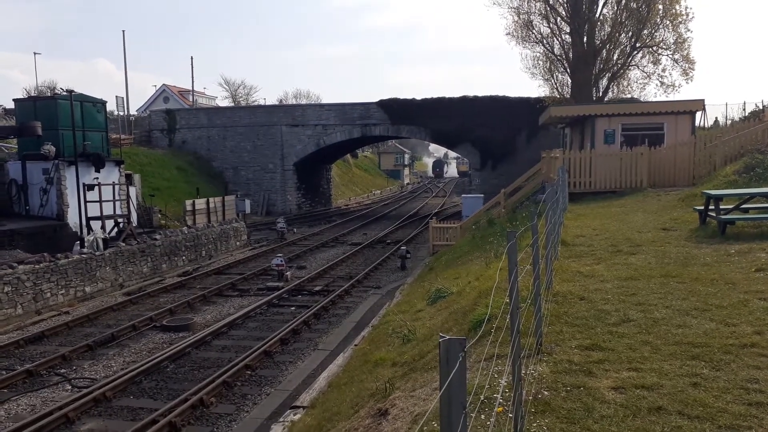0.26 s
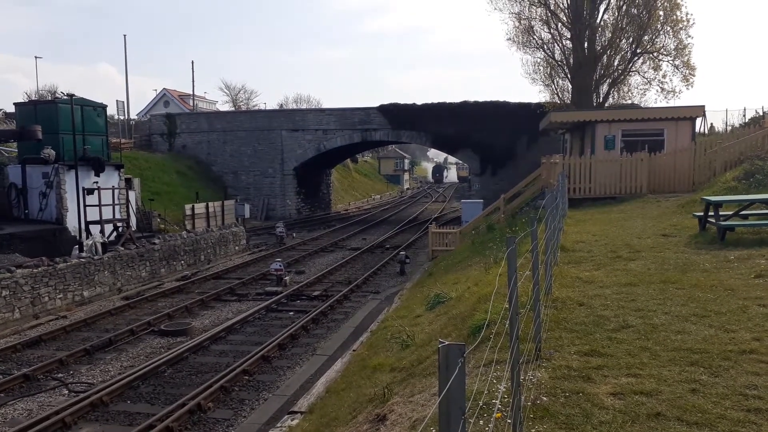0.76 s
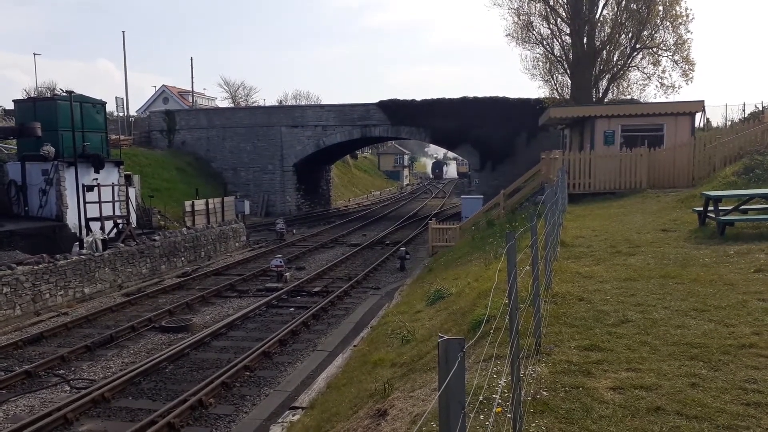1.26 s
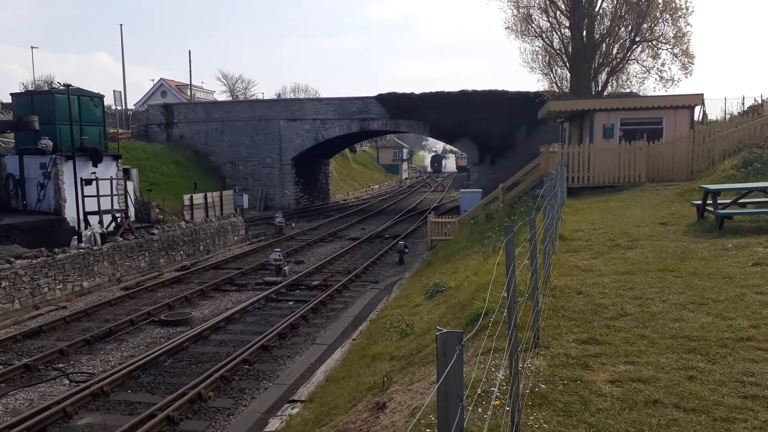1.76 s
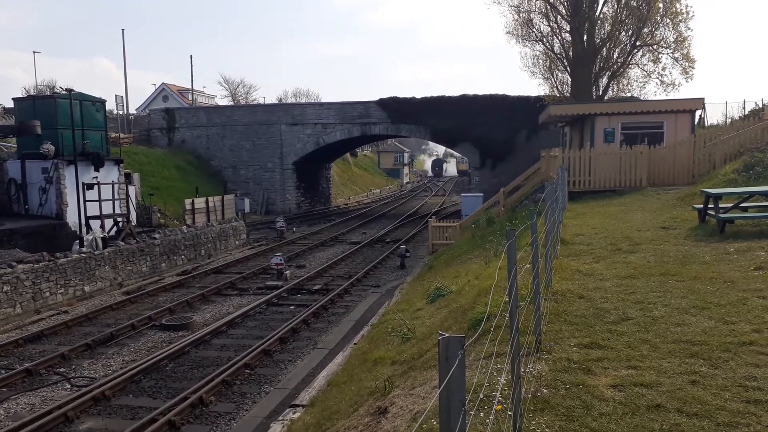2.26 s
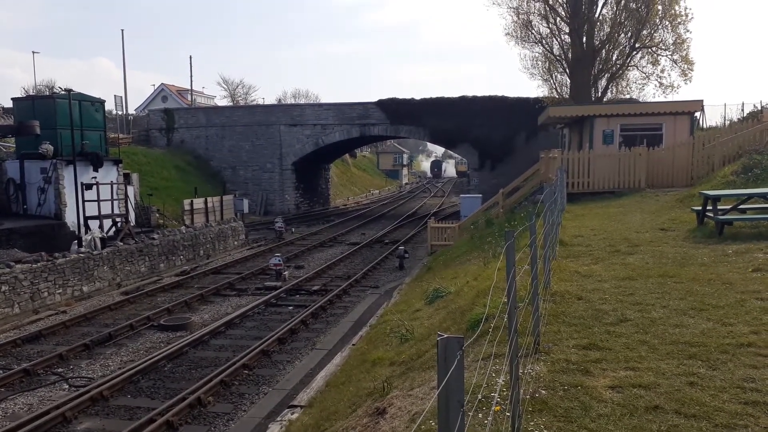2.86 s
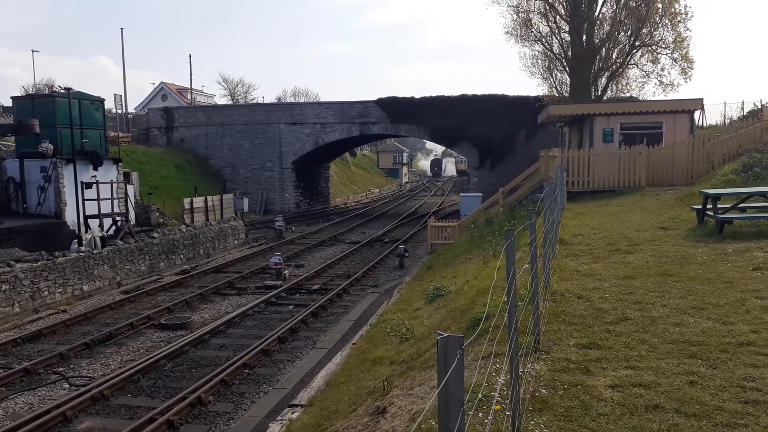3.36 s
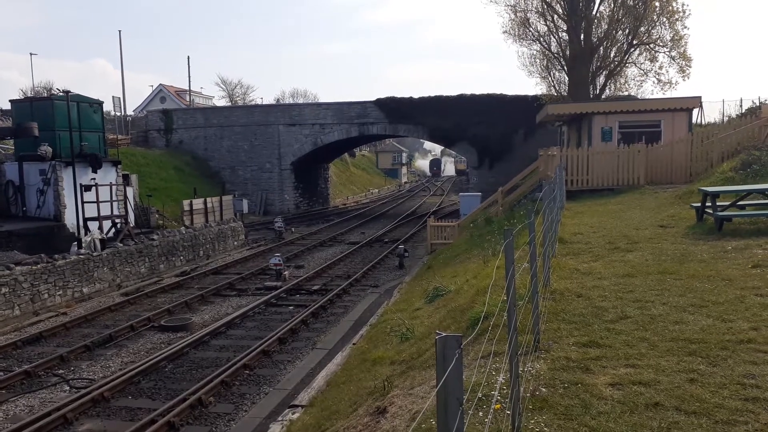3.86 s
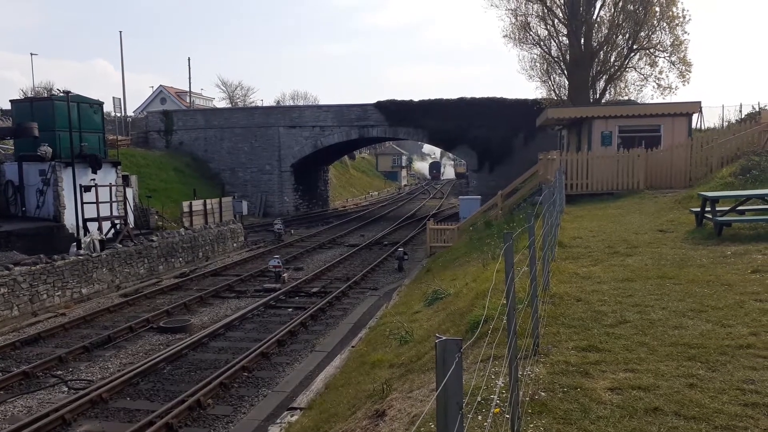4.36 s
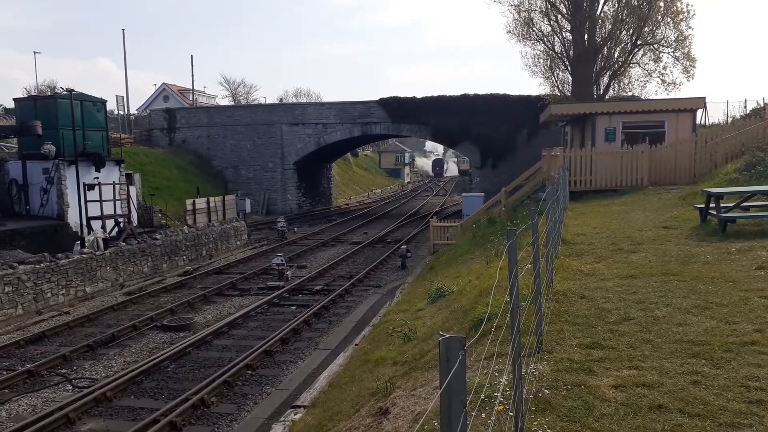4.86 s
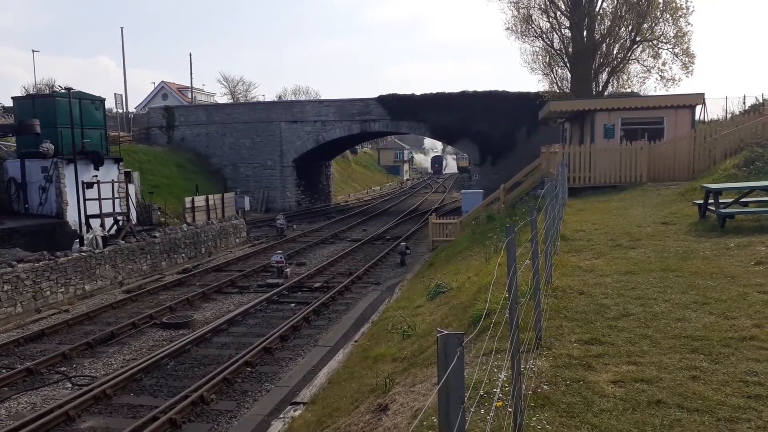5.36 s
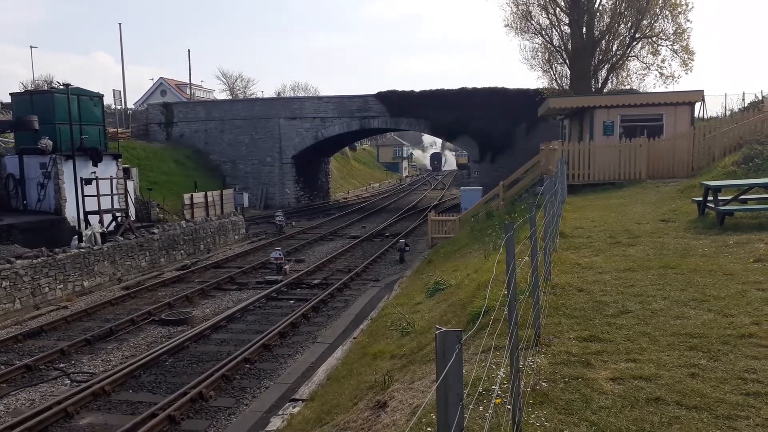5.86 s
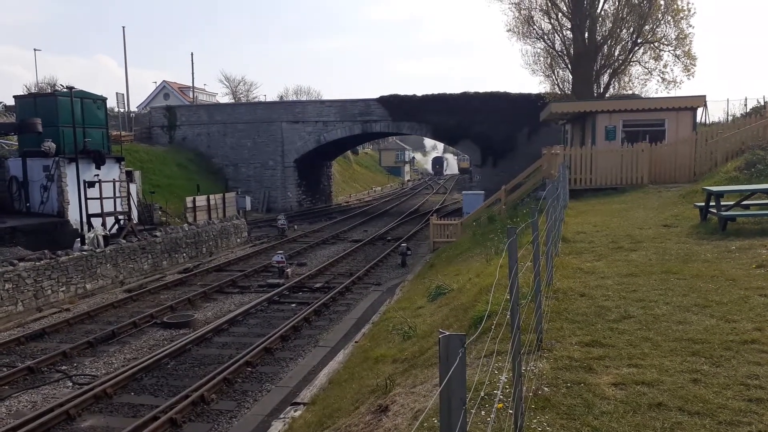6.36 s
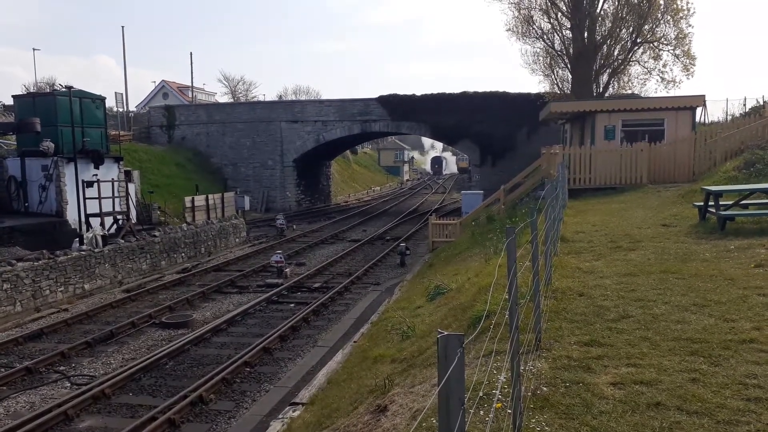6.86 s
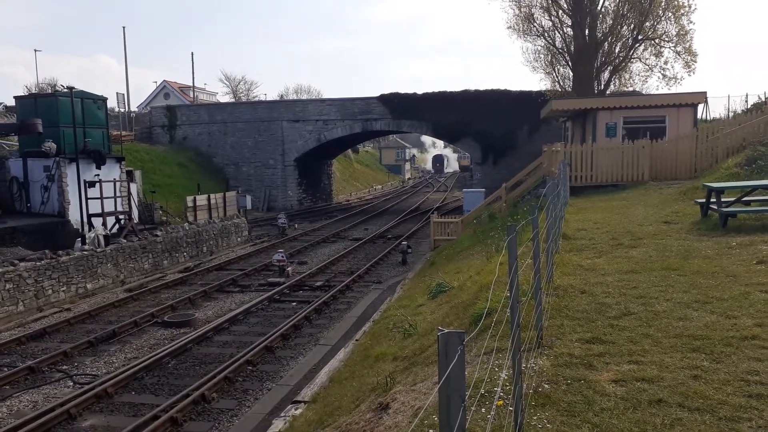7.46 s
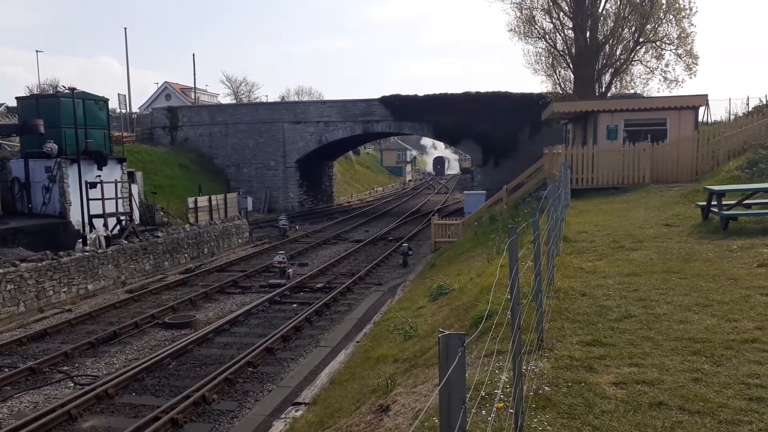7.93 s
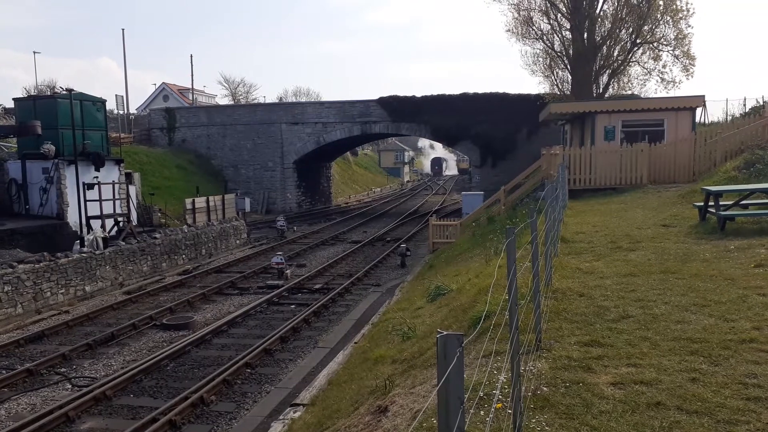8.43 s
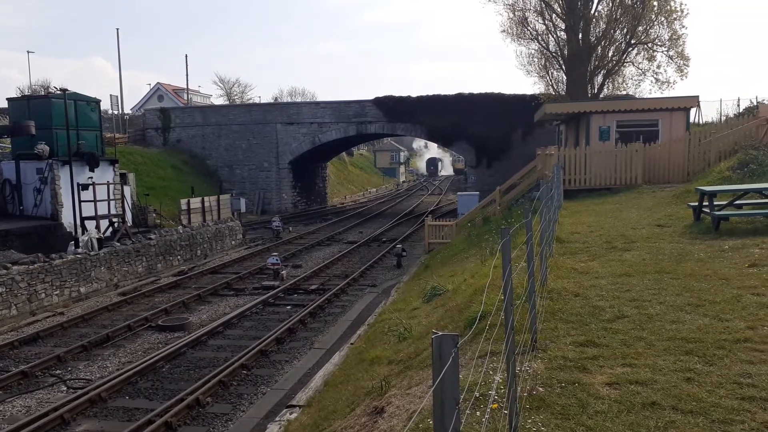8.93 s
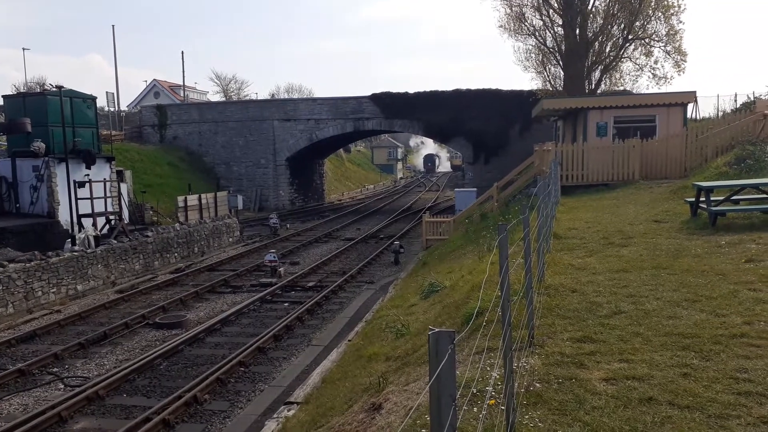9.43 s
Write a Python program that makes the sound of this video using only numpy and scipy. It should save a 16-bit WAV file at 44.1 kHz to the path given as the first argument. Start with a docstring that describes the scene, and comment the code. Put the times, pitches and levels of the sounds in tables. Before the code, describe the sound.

A steam locomotive beyond a stone bridge blows off steam, heard outdoors from beside the track. The first hiss is open at once at 0 s, with a brief faint rustle, and holds until about 1.3 s before dying quickly to a thin leak. Low wind bumps hit the microphone around 0.8-1.5 s, and softer ones at 2.4-2.9 s. A second swell opens near 3.4 s, fullest around 4.6 s, with bright spurts and faintly singing pitches, fading after 6 s into stronger leakage. A small wind thump falls at 4.5 s and weaker ones follow. The third and loudest rush starts abruptly at 7.5 s, with one hard little click at 7.9 s, gradually brightening and continuing to the end at 9.7 s. Throughout, a quiet engine hum, passing low drones and dull station background sit underneath; short stonework echoes put rippling colour in the hiss.

```python
"""Locomotive blowing off steam

A steam locomotive beyond a stone bridge blows its cylinder cocks in three long swells as it sets off.
Jets are banded noise with wandering peaks from echo ripple and pipes; some sing out. Stonework echoes.
Resonant noise makes the engine's hum and drones; a dull coloured noise is the station background.
Low noise gusts and sine buffets bump the microphone, with faint treble rustles and one click."""
import sys
import numpy as np
from scipy import signal
from scipy.fft import rfft, irfft, next_fast_len
from scipy.io import wavfile

SR = 44100
rng = np.random.default_rng(int(sys.argv[2]) if len(sys.argv) > 2 else 0)


def inscribe(sig):
    """Save sig as 16-bit PCM at rate SR to the path in sys.argv[1].

    A 1-D sig is mono; a 2-D sig holds one channel per row.
    Samples are clipped to [-1, 1] before scaling.
    """
    pcm = np.round(np.clip(np.atleast_2d(sig).T, -1, 1) * 32767)
    wavfile.write(sys.argv[1], SR, pcm.astype(np.int16))


N = 427329
TIME = np.arange(N) / SR
SIZE = 2 * next_fast_len(N // 2 + 1)
FREQ = np.maximum(np.arange(SIZE // 2 + 1) * SR / SIZE, 1)
SIDES = np.array([[1], [-1]])  # left, right
FRAME = 2048

# Side levels are left over right. Length of a swell: standard deviation of its bell.
# Station background colour: freq_hz, density_db
YARD_COLOUR = [(25, -37), (55, -1), (110, -9.5), (150, -3), (200, -1), (310, -1.9), (430, -5), (700, 4),
               (2000, -43), (9000, -24.5), (15500, -30.5)]
# Station background level, before trim: time_s, level_db
YARD_LEVEL = [(0, -50.5), (3.8, -51), (4.6, -55.5), (5.4, -52), (6.6, -53), (7.5, -51), (8.2, -56),
              (9.69, -54.5)]

# Steady engine notes, before trim and fade: pitch_hz, level_db
HUM_NOTES = [(190, -61), (113.7, -67.5), (220, -69.5), (302.6, -70), (336.5, -68.5), (374, -70.5)]
# Low drones that come and go: centre_s, pitch_hz, level_db, length_s
DRONE_NOTES = [(3.89, 287.4, -57, 0.21), (5.367, 245, -57.5, 0.074), (5.5, 127, -62, 0.39),
               (7.45, 302, -59, 0.084), (9.05, 117, -61, 0.19)]
HUM_PASS_WIDTH_HZ, HUM_WAVER_DB, HUM_FADE_DB_PER_S = 8.1, 1.5, 0.4

# Wind colour: freq_hz, density_db
WIND_COLOUR = [(20, -34), (35, -30), (52, 0.5), (90, -2), (140, -8), (250, -17), (500, -36), (1500, -70)]
# Gusts on the microphone, before trim: centre_s, level_db, length_s, side_db
GUST_SWELLS = [(0.01, -45, 0.11, -8), (0.873, -40, 0.063, 2), (.68, -52, 0.13, 23), (1.044, -46, 0.092, 2),
               (1.21, -44, 0.055, -9), (1.38, -43, 0.038, -11), (1.527, -49.5, 0.19, 10),
               (1.93, -50.5, 0.026, 9.5), (2.49, -52, 0.046, 12), (2.88, -50, 0.11, 13),
               (3.04, -52, .04, 1), (3.22, -54.5, 0.066, -7), (4.546, -47, 0.075, 21),
               (4.917, -53, 0.046, 18), (5.77, -54, 0.063, 18), (6.35, -61, 0.44, 6), (7.1, -57, 0.17, 9),
               (8.27, -58, 0.073, 9)]
# Sharp buffets: centre_s, level_db, pitch_hz, length_s (to 1/e), side_db
BUFFET_PULSES = [(.834, -35, 95, 0.0079, 4), (0.855, -27, 86, .012, -9), (.897, -35, 100, .014, 7),
                 (1.238, -32, 89, 0.012, -17), (1.328, -37, 85, 0.0083, 10), (1.382, -38, 95, .008, -10),
                 (1.408, -37, 90, .008, -11), (1.504, -42, 85, 0.0093, 9), (2.415, -37, 136, .007, 3),
                 (2.489, -43, 60, 0.013, 14), (2.805, -40, 60, .016, 12), (2.854, -39.5, 72, 0.015, 2),
                 (2.906, -38, 80, .011, 7), (4.556, -46, 115, .016, 14), (4.908, -44, 76, .02, 16),
                 (5.772, -42, 62, .022, 16)]
# Light air between gusts, before trim
BREEZE_DB, BREEZE_SIDE_DB, BREEZE_SWING_DB, BREEZE_HZ = -64, 23, 7.5, 3.6

# Faint high rustles: centre_s, level_db, length_s
RUSTLE_STROKES = [(0.048, -53, 0.083), (1.92, -64, .05), (2.03, -62, .06), (2.67, -60, .03),
                  (3.95, -62, .03)]
# Rustle colour: freq_hz, density_db
RUSTLE_COLOUR = [(5000, -30), (9000, 0), (12000, -1), (15500, -4)]
CLICK_S, CLICK_DB, CLICK_HZ, CLICK_DECAY_S = 7.877, -22, 2500, 0.0015

# Smooth jet colour: freq_hz, density_db
JET_COLOUR = [(300, -36), (450, -36), (575, -12), (850, -12.5), (1270, -8), (1600, -5), (2850, -3.5),
              (4000, -1), (5700, -3.5), (6700, -7), (8200, -12.5), (9200, -24), (12000, -25.5),
              (16000, -45)]
# Mean peaks in the steam's colour, narrow low ones from echo ripple, broader ones from pipes:
# pitch_hz, width_hz, lift_db
STEAM_PEAKS = [(706, 14, 6), (860, 19, 4), (988, 56, 7.5), (1098, 64, 4.5), (1440, 22, 6), (1551, 26, 4),
               (1686, 95, 4.5), (2054, 140, 4), (2225, 17, 5.5), (2407, 32, 4), (2567, 130, 4),
               (3160, 127, 5), (3323, 104, 5), (3850, 160, 4), (4340, 160, 1), (5030, 180, 3.5),
               (5800, 130, 2), (7180, 260, 1.5), (7720, 820, 3), (9500, 300, 2.5)]
# Peaks that sing out: centre_s, length_s, pitch_hz, width_hz, extra_lift_db
SINGING_PEAKS = [(0.502, 0.28, 3950, 500, 2), (0.746, 0.026, 900, 500, 3), (.9, 0.31, 3090, 150, 3),
                 (2.2, 0.18, 3080, 200, 3), (3.855, 0.08, 3420, 200, 3.5), (4.55, 0.073, 3440, 110, 7),
                 (4.7, .22, 3930, 180, 4.5), (5.22, .16, 3900, 260, 4), (4.95, 0.38, 1870, 110, 5.5),
                 (5.0, 0.45, 3360, 180, 4.5), (5.05, 0.49, 8250, 700, 5.5), (5.2, 0.57, 2670, 200, 4.5),
                 (4.9, 0.1, 2430, 120, 4), (5.42, 0.11, 2540, 130, 5), (5.66, 0.15, 800, 600, 3.5),
                 (5.69, 0.28, 1910, 480, 5.5), (5.92, 0.14, 2530, 160, 5.5), (6.0, .15, 3290, 240, 4),
                 (7.05, .25, 3880, 260, 4), (7.1, 0.58, 746, 260, 6), (7.15, 0.22, 3420, 147.4, 2),
                 (7.615, 0.049, 805, 600, 1), (7.65, 0.23, 3320, 110, 5.5), (7.66, .07, 5200, 220, 4),
                 (7.8, 0.081, 3200, 120, 5), (7.82, 0.33, 2490, 150, 5.5), (8.15, 0.071, 5230, 260, 6),
                 (8.45, 0.21, 2480, 130, 5.5), (9.25, .35, 2470, 120, 8), (9.3, 0.15, 3370, 70, 8)]
# Spread of each steam peak's pitch and lift (shares), duration of a change
PEAK_WANDER, PEAK_SWING, PEAK_WANDER_S = 0.004, 0.07, 0.46
# Patches in the colour of the hiss
MOTTLE_DB, MOTTLE_HZ, MOTTLE_S = 1.0, 110, 0.23

# Steam at the two microphone ports, level: freq_hz, side_db
PORT_BALANCE = [(500, 3.5), (1800, 4), (2200, 4.5), (2500, 4), (2780, 3.5), (3100, 4), (3520, 4),
                (4200, 0.5), (4750, -5), (5600, 4.5), (6500, -0.5), (7300, 8.5), (8800, 9.5), (11500, 0.5)]
# Steam at the two ports, correlation: freq_hz, likeness
PORT_LIKENESS = [(100, .7), (700, .98), (1500, 0.66), (3000, 0.77), (4500, .96), (6000, 0.97), (7000, .68),
                 (9000, 0.53), (11500, 0.94), (13500, 0.87), (15500, .2)]
# Steam at the two ports, phase: freq_hz, left_lead_rad
PORT_LEAD = [(100, -0.4), (1900, -0.33), (2250, -1.5), (2700, 1), (3300, -.8), (4100, -1.5), (4800, -1),
             (5300, -1), (6250, -0.9), (6850, -1.4), (7500, -1), (9100, -2), (11000, -2.5)]

# Flow levels below are before the steam's trim.
# One blow per piston stroke, the first open almost at once: start_s, opening_s, fullest_after_s,
# shuts_after_s, dying_s, rush_db, hiss_db and sizzle_db (re rush), ring_db (re open jet),
# brightening_db_per_s
BLOW_STROKES = [(0.0, 0.00053, 0.32, 1.3, 0.22, -28, -6.5, -15, 3.5, -1.9),
                (3.385, 0.093, 1.19, 2.665, .15, -28, -5, -12.5, 2.2, -0.57),
                (7.522, 0.035, 0.77, 2.6, .2, -24.5, -7, -14.5, 1.2, 1.5)]
# Steam leaking between blows: time_s, rush_db
LEAK_LEVEL = [(0, -35), (1.9, -39), (2.7, -36.5), (3.35, -37), (6.3, -31), (6.8, -33), (7.5, -28.5),
              (8.3, -31.5), (9.69, -26.5)]
# Brief bright spurts: centre_s, rush_db, length_s, sizzle_db (re rush)
SPURT_SWELLS = [(1.263, -38, 0.05, -13), (3.76, -42, .03, -8), (3.932, -31, 0.035, -15),
                (4.305, -30, 0.1, -13), (4.49, -30.5, 0.096, -11), (4.813, -31, .08, -11),
                (5.282, -31.5, 0.29, -5.5), (5.926, -37, 0.16, -6.5), (7.62, -25, 0.059, -22),
                (8.5, -43, .18, 2), (8.98, -29.5, .05, -11), (9.358, -37, .07, -7)]
LEAK_RING_DB, LEAK_HISS_DB, LEAK_SIZZLE_DB = 3, -7, -13
SPURT_RING_DB, SPURT_HISS_DB = 6.5, -4
ARCH_DB_PER_S2 = 2.5
TREBLE_LAG_DB, DULLING_DB_PER_S = 10, 14

# Low roar: level at a reference jet level, share of the jet's dB swing it follows
ROAR_DB, ROAR_AT_JET_DB, ROAR_FOLLOWS = -42, -33, 0.52
ROAR_GROWTH_DB_PER_S = 0.1  # as the engine gets under way

# Echoes from ground and stonework: mean_delay_s, level_db (re direct)
STONE_ECHOES = [(.0022, -18), (.0105, -15), (.017, -16), (.047, -15)]
CUTOFF_HZ = 15800


def from_db(db):
    """Decibels to gain."""
    return 10 ** (np.asarray(db) / 20)


def in_time(points):
    """Level curve joined by straight lines."""
    time_s, level_db = np.transpose(points)
    return np.interp(TIME, time_s, level_db)


def over_hz(points):
    """Table read at every frequency on a log axis."""
    hz, value = np.transpose(points)
    return np.interp(np.log(FREQ), np.log(hz), value)


def white():
    """Spectrum of fresh white noise."""
    return rng.standard_normal(len(FREQ)) + 1j * rng.standard_normal(len(FREQ))


def sound(spectrum):
    """Stereo spectrum to waveform; the mean of both sides has rms 1."""
    x = irfft(spectrum, SIZE)[:, :N]
    return x / np.std(x.mean(axis=0))


def resonance(hz, width_hz):
    """Response of one resonance, 1 at its peak."""
    return 1 / (1 + 1j * (FREQ ** 2 - hz ** 2) / (FREQ * width_hz))


def drift(rate_hz):
    """Slow random curve with spread 1."""
    x = irfft(white() / (1 + (FREQ / rate_hz) ** 2), SIZE)[:N]
    return x / np.std(x)


def smooth_chance(shape, *spans):
    """Random field with spread 1, smoothed over a span of steps along each axis."""
    x = rng.standard_normal(shape)
    for axis, span in enumerate(spans):
        rate = np.fft.rfftfreq(shape[axis])
        spectrum = rfft(np.swapaxes(x, axis, -1)) * np.exp(-(2 * rate * span) ** 2)
        x = np.swapaxes(irfft(spectrum, shape[axis]), axis, -1)
    return x / np.std(x)


def noise_pair(likeness, side_db, lead_rad=0):
    """Spectra of partly alike noise at two ports, with level and phase offsets."""
    pair = np.sqrt(1 + likeness) * white() + np.sqrt(1 - likeness) * white() * SIDES
    return pair * from_db(SIDES * side_db / 2) * np.exp(0.5j * SIDES * lead_rad)


def ports(side_db):
    """Left and right gains of mean power 1."""
    pair = from_db(SIDES * side_db / 2)
    return pair / np.sqrt(np.mean(pair ** 2))


def swell(centre_s, length_s):
    """Bell-shaped rise and fall of height 1."""
    return np.exp(-((TIME - centre_s) / length_s) ** 2 / 2)


def together(gains):
    """Unrelated flows add in power."""
    return np.sqrt(sum(g ** 2 for g in gains))


def yard(trim_db=1.0):
    """Dull station background: coloured noise on a slow level curve."""
    noise = sound(noise_pair(likeness=0.87, side_db=4.0) * from_db(over_hz(YARD_COLOUR)))
    return from_db(in_time(YARD_LEVEL) + trim_db) * noise


def hum(trim_db=-0.3, waver_hz=1.2):
    """Engine notes as narrow resonances of noise: steady ones waver and fade, drones swell and sink."""
    throb = noise_pair(likeness=0.88, side_db=7.5)

    def note(hz):
        return sound(throb * resonance(hz, HUM_PASS_WIDTH_HZ) ** 2)

    steady = sum(from_db(db) * note(hz) for hz, db in HUM_NOTES)
    drones = sum(from_db(db) * swell(s, length_s) * note(hz) for s, hz, db, length_s in DRONE_NOTES)
    level_db = trim_db + HUM_WAVER_DB * drift(waver_hz) - HUM_FADE_DB_PER_S * TIME
    return steady * from_db(level_db) + drones


def gusts(trim_db=-3):
    """Wind rumble, little alike at the two ports: gusts over a light breeze."""
    breeze_db = BREEZE_DB + BREEZE_SWING_DB * np.tanh(drift(BREEZE_HZ))
    forces = [from_db(breeze_db) * ports(BREEZE_SIDE_DB)]
    for s, db, length_s, side_db in GUST_SWELLS:
        forces.append(from_db(db) * swell(s, length_s) * ports(side_db))
    rumble = sound(noise_pair(likeness=0.23, side_db=-0.2) * from_db(over_hz(WIND_COLOUR)))
    return from_db(trim_db) * together(forces) * rumble


def buffets():
    """Single low swings of pressure: sines under a short bell, random phase per port."""
    out = 0
    for s, db, hz, length_s, side_db in BUFFET_PULSES:
        age_s = TIME - s
        phase_rad = rng.uniform(0, 2 * np.pi) + rng.normal(0, 1.0, (2, 1))
        swing = np.exp(-(age_s / length_s) ** 2) * np.sin(2 * np.pi * hz * age_s + phase_rad)
        out = out + ports(side_db) * from_db(db) * swing
    return out


def rustles():
    """Short, thin brushing sounds: swells of treble noise."""
    strokes = sum(from_db(db) * swell(s, length_s) for s, db, length_s in RUSTLE_STROKES)
    return strokes * sound(noise_pair(likeness=0.1, side_db=4.0) * from_db(over_hz(RUSTLE_COLOUR)))


def click():
    """One hard tick in the last swell: resonant noise with a fast rise and decay."""
    age = np.maximum(TIME - CLICK_S, 0) / CLICK_DECAY_S
    knock = sound(noise_pair(likeness=0.8, side_db=4) * resonance(CLICK_HZ, width_hz=1800) ** 3)
    return from_db(CLICK_DB) * age * np.exp(1 - age) * knock


def voices(rush, ring_db, hiss_db, sizzle_db):
    """Gains of open jet, ringing band, upper hiss and sizzle; the first two share the rush power."""
    open_jet = rush / together([1, from_db(ring_db)])
    ringing = open_jet * from_db(ring_db)
    return np.array([open_jet, ringing, rush * from_db(hiss_db), rush * from_db(sizzle_db)])


def leak():
    """Steam that seeps at all times, in a fixed colour."""
    return voices(from_db(in_time(LEAK_LEVEL)), LEAK_RING_DB, LEAK_HISS_DB, LEAK_SIZZLE_DB)


def spurts():
    """Brief bright bursts of flow."""
    return [voices(from_db(db) * swell(s, length_s), SPURT_RING_DB, SPURT_HISS_DB, sizzle_db)
            for s, db, length_s, sizzle_db in SPURT_SWELLS]


def blows():
    """Port flow arches about mid-stroke; treble fills in after opening and dies first on shutting."""
    parts = []
    for (start_s, opening_s, fullest_s, shuts_s, dying_s, rush_db,
         hiss_db, sizzle_db, ring_db, brightening) in BLOW_STROKES:
        age_s = TIME - start_s
        closing_s = np.maximum(age_s - shuts_s, 0)
        port = np.clip(age_s / opening_s, 0, 1) * np.exp(-closing_s / dying_s)
        rush = port * from_db(rush_db - ARCH_DB_PER_S2 * (age_s - fullest_s) ** 2)
        bright_db = brightening * (age_s - fullest_s)
        lag_db = TREBLE_LAG_DB * np.exp(-np.maximum(age_s, 0) / opening_s)
        treble_db = bright_db - DULLING_DB_PER_S * closing_s - lag_db
        parts.append(voices(rush, ring_db + bright_db, hiss_db + treble_db, sizzle_db + treble_db))
    return parts


def through_peaks(spectrum):
    """Mottled jet noise with peaks that wander in pitch and lift; some sing out for a while."""
    hz, t, frames = signal.stft(irfft(spectrum, SIZE), SR, nperseg=FRAME)
    lift_db = MOTTLE_DB * smooth_chance((len(hz), len(t)), MOTTLE_HZ / hz[1], MOTTLE_S / t[1])
    for centre_hz, width_hz, db in STEAM_PEAKS:
        pitch = smooth_chance(t.shape, PEAK_WANDER_S / t[1])
        strength = smooth_chance(t.shape, PEAK_WANDER_S / t[1])
        off_hz = hz[:, None] - centre_hz * (1 + PEAK_WANDER * pitch)
        lift_db = lift_db + db * (1 + PEAK_SWING * strength) / (1 + (2 * off_hz / width_hz) ** 2)
    for s, length_s, centre_hz, width_hz, db in SINGING_PEAKS:
        off_hz = hz[:, None] - centre_hz
        bell = np.exp(-((t - s) / length_s) ** 2 / 2)
        lift_db = lift_db + db * bell / (1 + (2 * off_hz / width_hz) ** 2)
    shaped = signal.istft(frames * from_db(lift_db), SR, nperseg=FRAME)[1]
    return rfft(shaped, SIZE)


def steam(flutter_db=0.52, flutter_hz=12, wander_db=0.42, wander_hz=3, rush_trim_db=-0.5):
    """Turbulent jets with peaked colour: five bands from big roaring eddies to small sizzling ones."""
    open_jet, ringing, hiss, sizzle = together([leak()] + spurts() + blows())
    roar_db = ROAR_DB + ROAR_GROWTH_DB_PER_S * TIME
    roar = from_db(roar_db) * (open_jet / from_db(ROAR_AT_JET_DB)) ** ROAR_FOLLOWS
    noise = noise_pair(over_hz(PORT_LIKENESS), over_hz(PORT_BALANCE), over_hz(PORT_LEAD))
    jet = through_peaks(noise * from_db(over_hz(JET_COLOUR)))
    edges_hz = [1, 1400, 2850, 4400, 6500, SR]
    out = 0
    for low, high, gain in zip(edges_hz, edges_hz[1:], [roar, open_jet, ringing, hiss, sizzle]):
        band = 1 / (1 + (FREQ / high) ** 60) - 1 / (1 + (FREQ / low) ** 60)
        out = out + gain * from_db(wander_db * drift(wander_hz)) * sound(jet * band)
    return out * from_db(rush_trim_db + flutter_db * drift(flutter_hz))  # uneven flow


def outdoors(x, wander_s=0.00013, wander_hz=0.4):
    """Moving air varies each echo's path, so fine ripples wander through the hiss."""
    out, power = x, 1
    for delay_s, db in STONE_ECHOES:
        heard_at_s = TIME - delay_s - wander_s * drift(wander_hz)
        echo = np.array([np.interp(heard_at_s, TIME, side, left=0) for side in x])
        out = out + from_db(db) * echo
        power = power + from_db(db) ** 2
    return out / np.sqrt(power)


def scene():
    """Background, hum, wind and small sounds, with the echoing steam over them."""
    near = gusts() + buffets() + rustles() + click()
    return yard() + hum() + near + outdoors(steam())


def record(dry):
    """Steep elliptic low-pass."""
    lowpass = signal.ellip(12, 0.1, 90, CUTOFF_HZ, fs=SR, output="sos")
    return signal.sosfilt(lowpass, dry)


dry = scene()
out = record(dry)
inscribe(out)
```